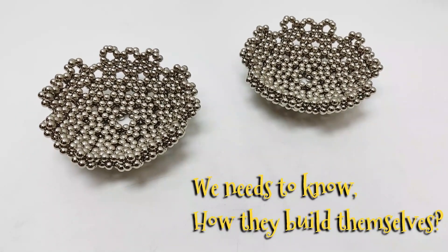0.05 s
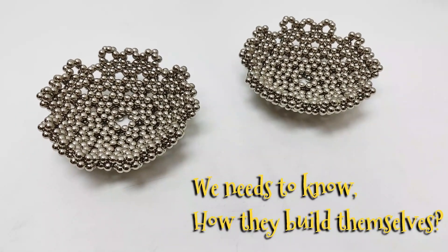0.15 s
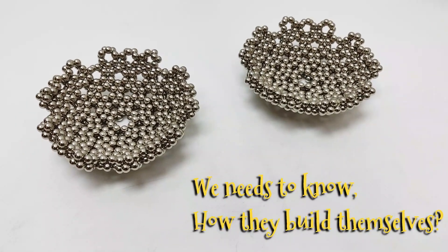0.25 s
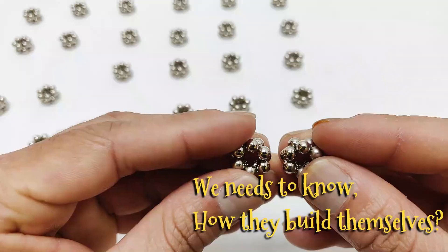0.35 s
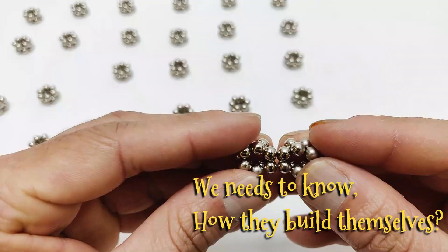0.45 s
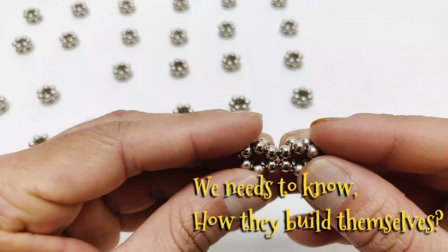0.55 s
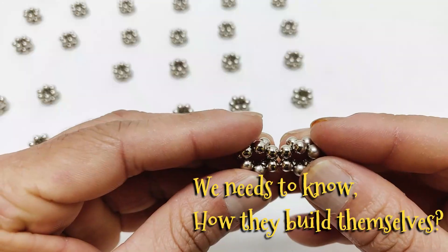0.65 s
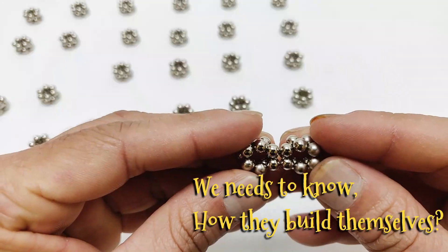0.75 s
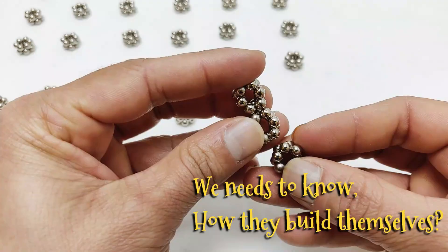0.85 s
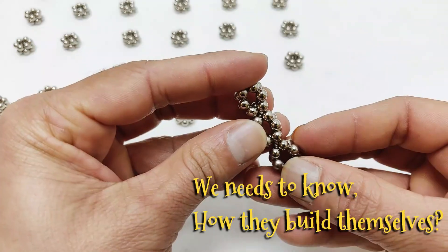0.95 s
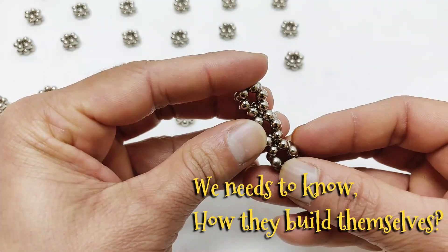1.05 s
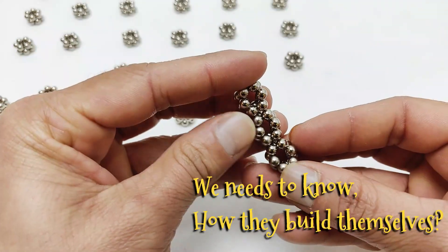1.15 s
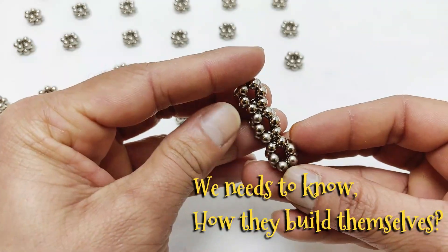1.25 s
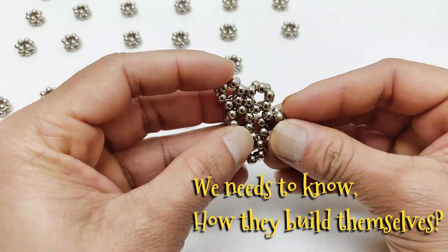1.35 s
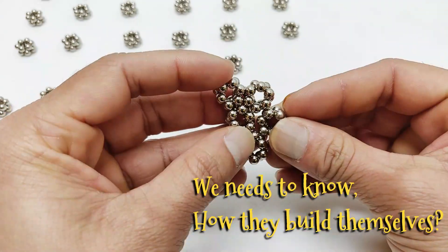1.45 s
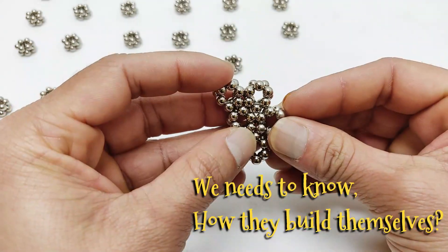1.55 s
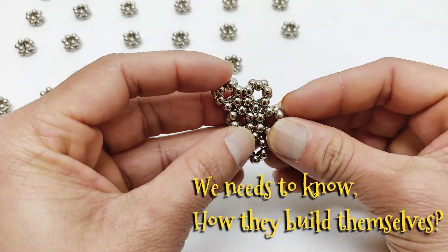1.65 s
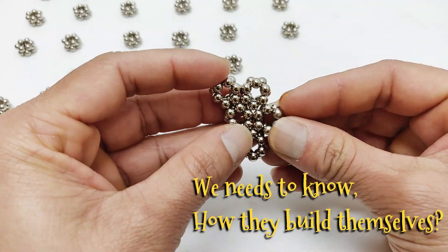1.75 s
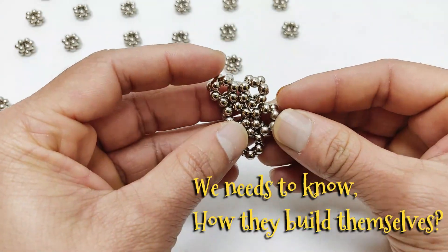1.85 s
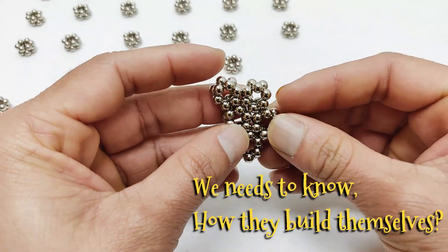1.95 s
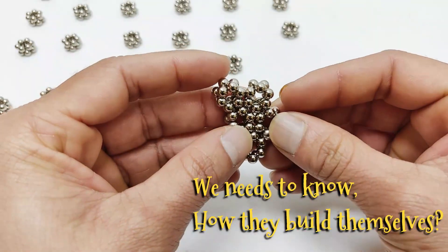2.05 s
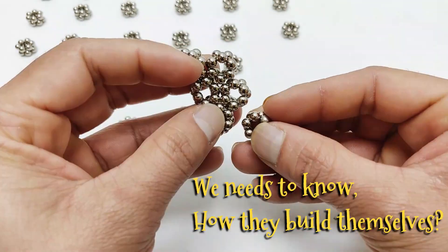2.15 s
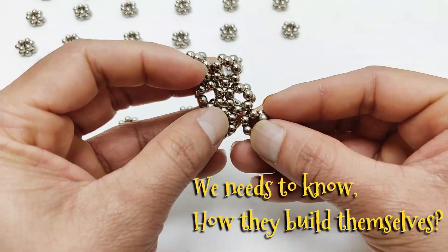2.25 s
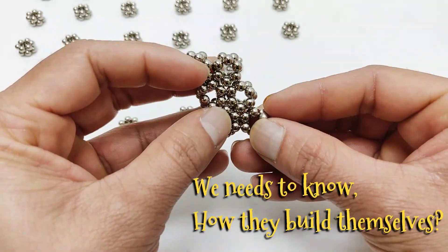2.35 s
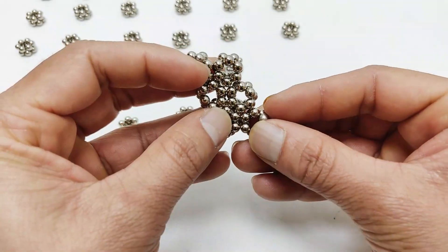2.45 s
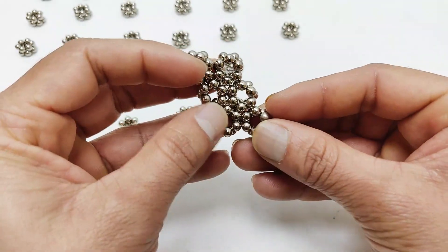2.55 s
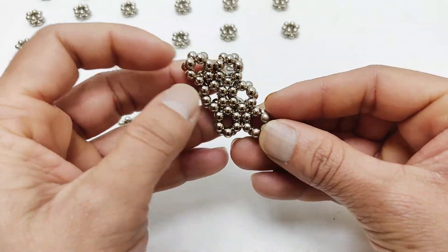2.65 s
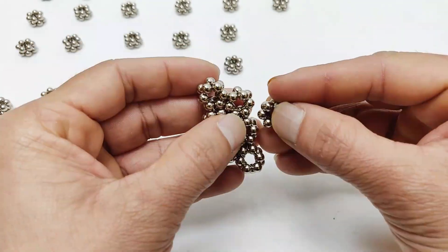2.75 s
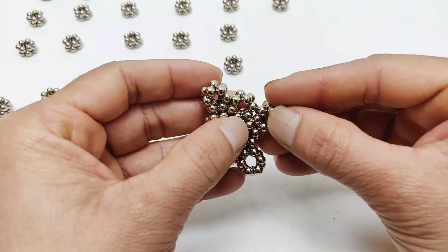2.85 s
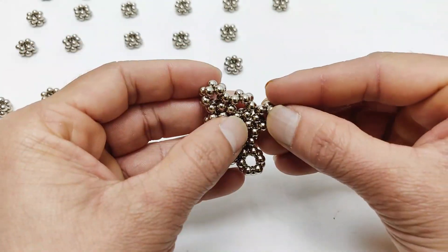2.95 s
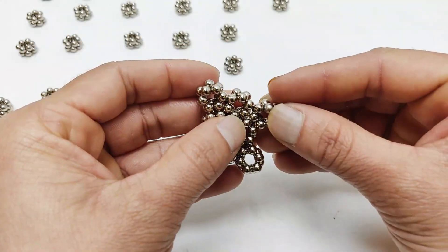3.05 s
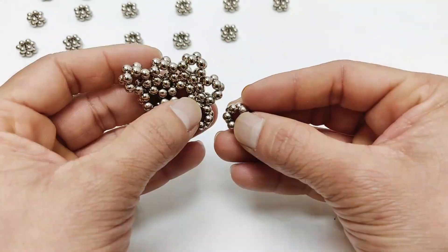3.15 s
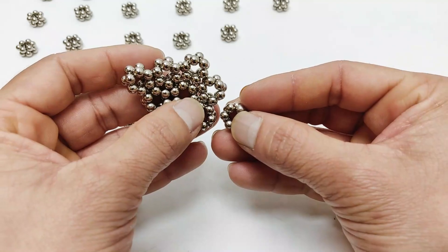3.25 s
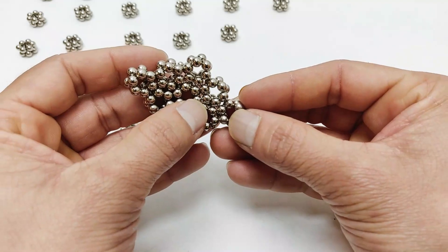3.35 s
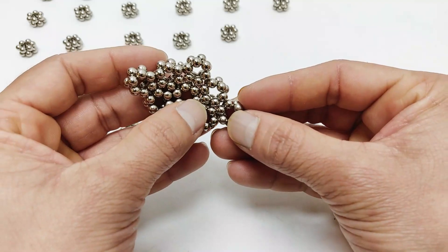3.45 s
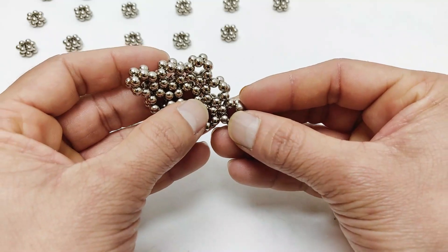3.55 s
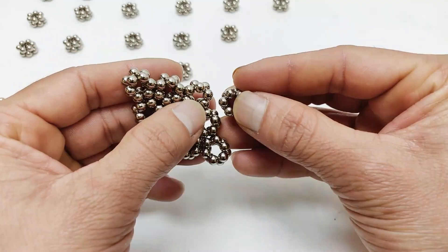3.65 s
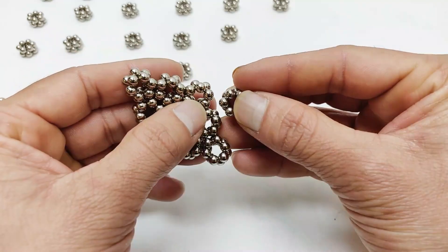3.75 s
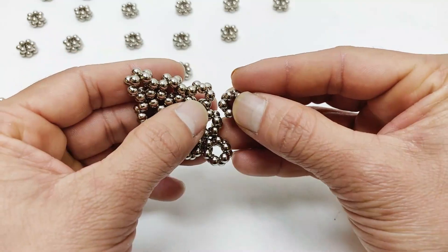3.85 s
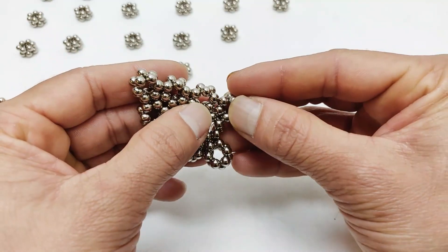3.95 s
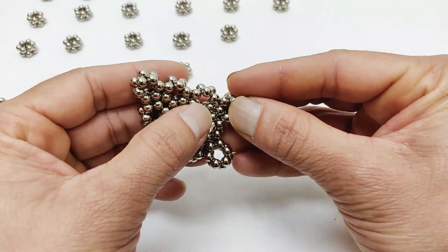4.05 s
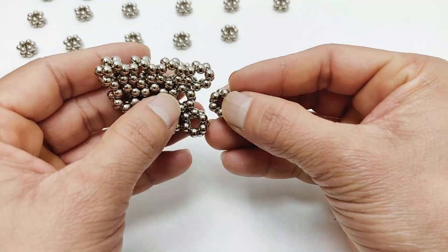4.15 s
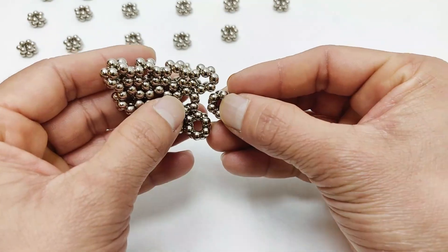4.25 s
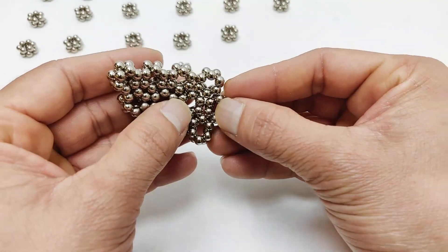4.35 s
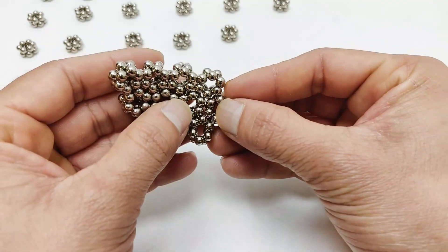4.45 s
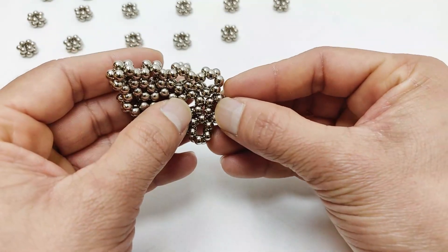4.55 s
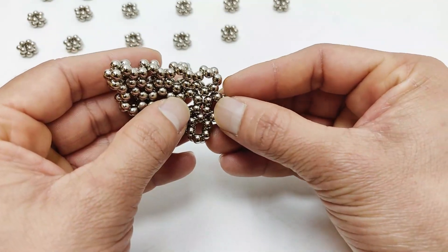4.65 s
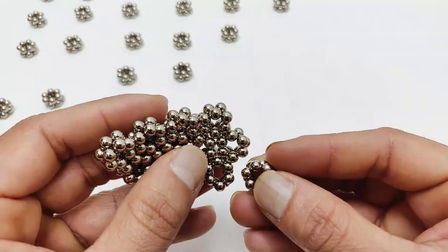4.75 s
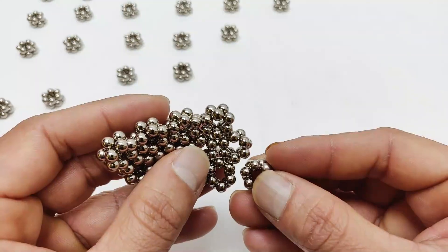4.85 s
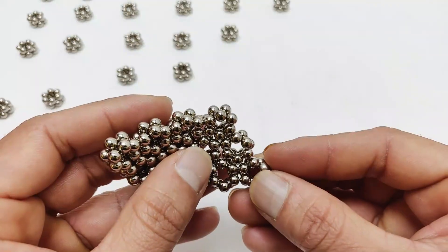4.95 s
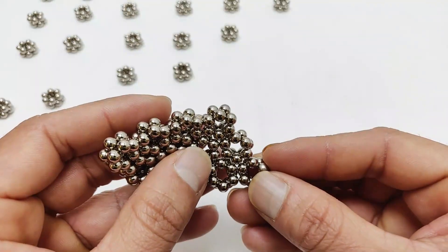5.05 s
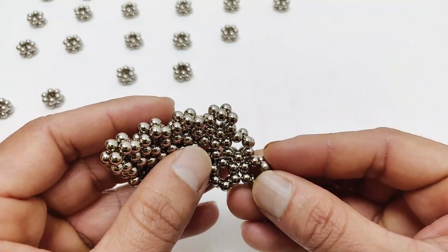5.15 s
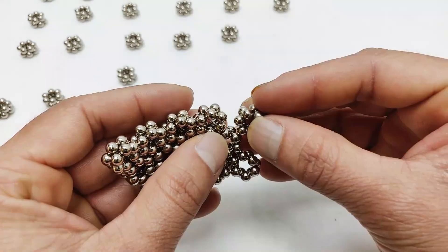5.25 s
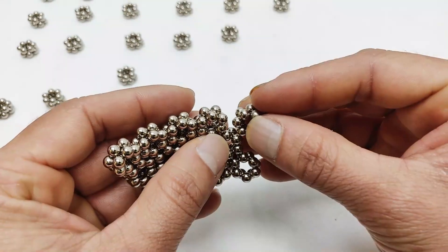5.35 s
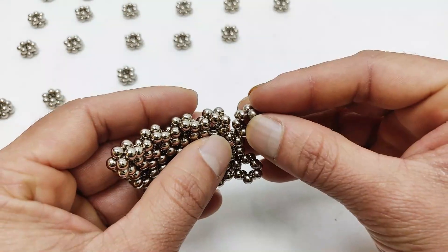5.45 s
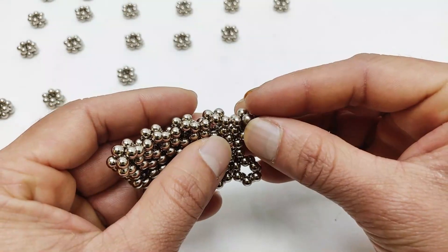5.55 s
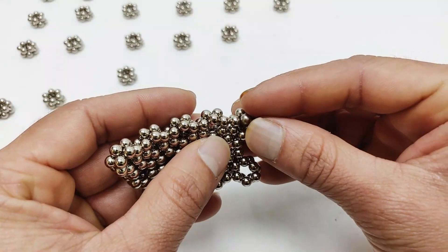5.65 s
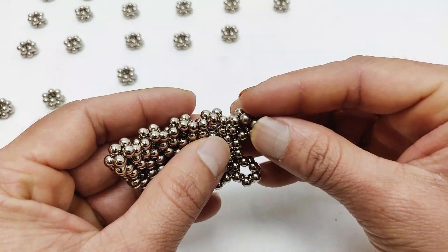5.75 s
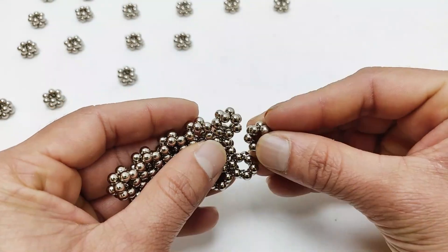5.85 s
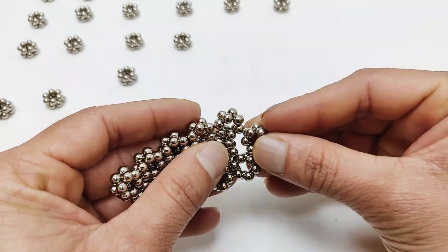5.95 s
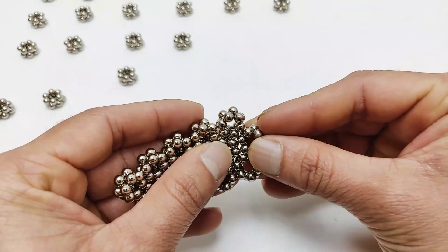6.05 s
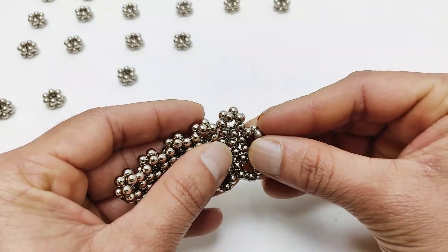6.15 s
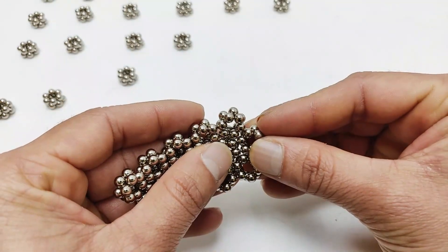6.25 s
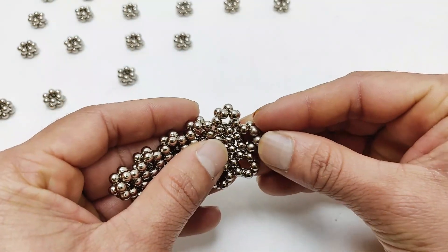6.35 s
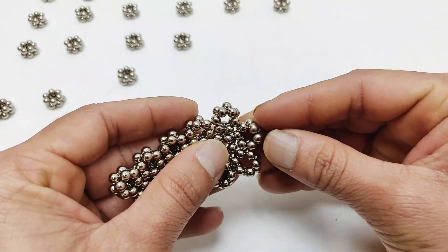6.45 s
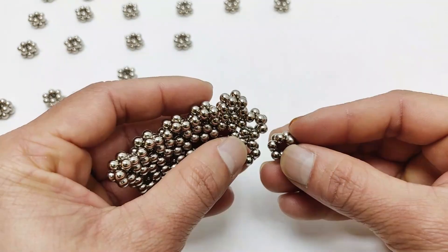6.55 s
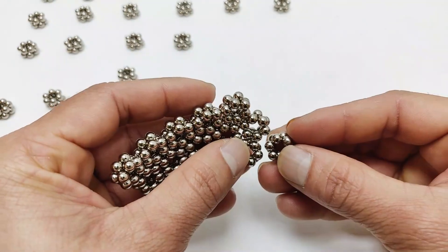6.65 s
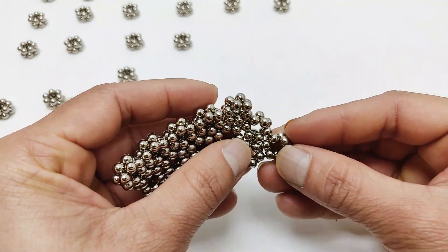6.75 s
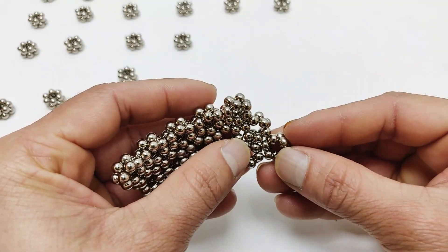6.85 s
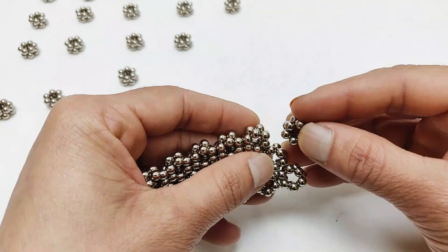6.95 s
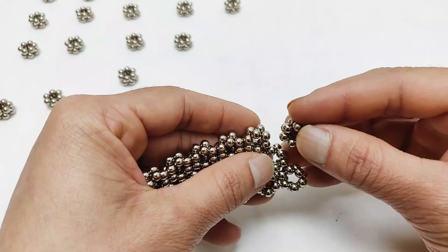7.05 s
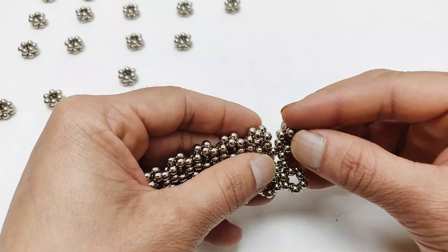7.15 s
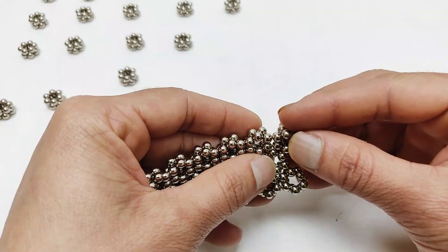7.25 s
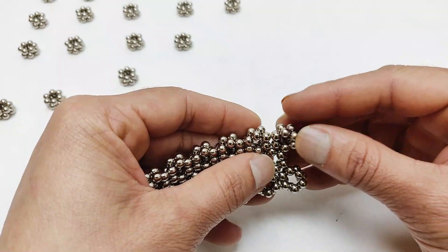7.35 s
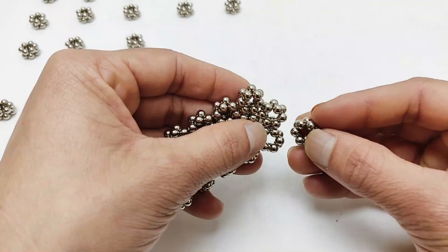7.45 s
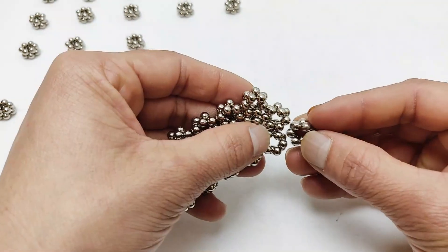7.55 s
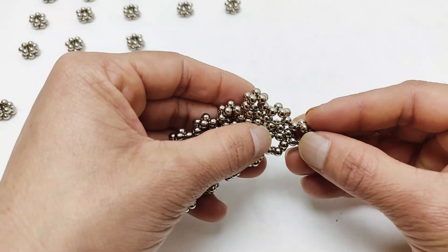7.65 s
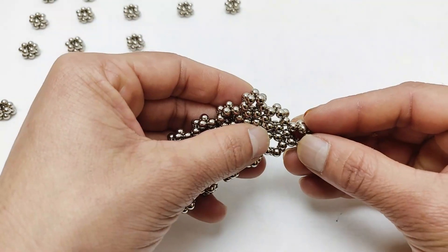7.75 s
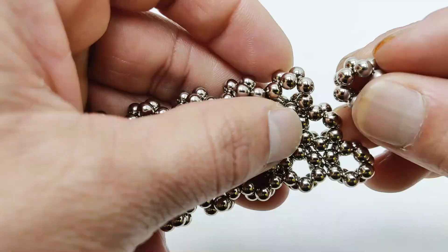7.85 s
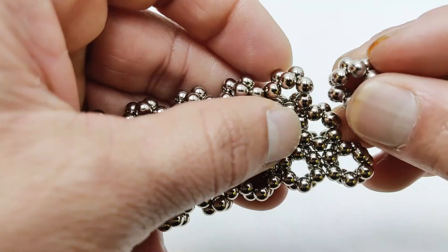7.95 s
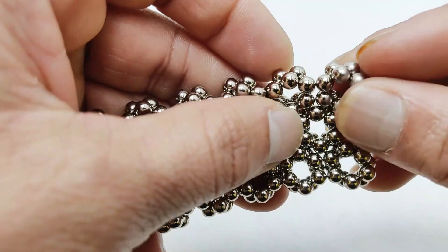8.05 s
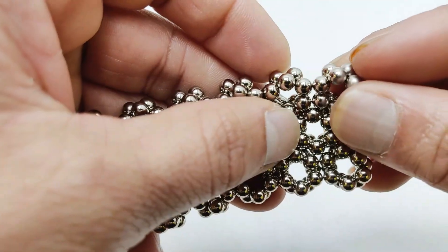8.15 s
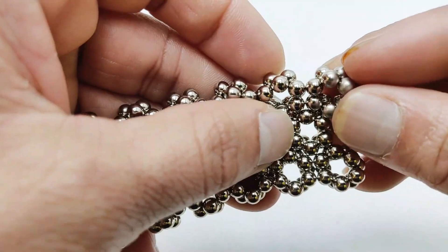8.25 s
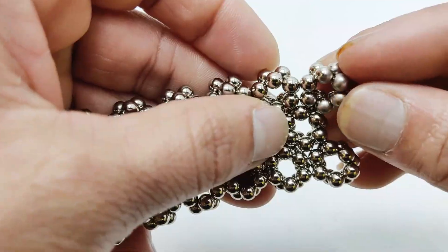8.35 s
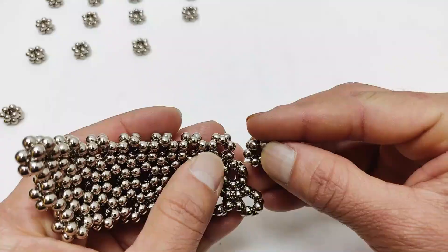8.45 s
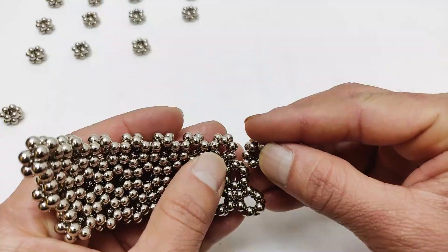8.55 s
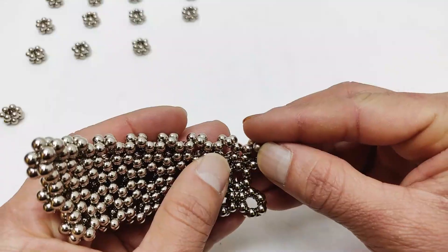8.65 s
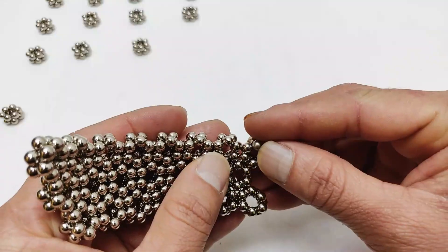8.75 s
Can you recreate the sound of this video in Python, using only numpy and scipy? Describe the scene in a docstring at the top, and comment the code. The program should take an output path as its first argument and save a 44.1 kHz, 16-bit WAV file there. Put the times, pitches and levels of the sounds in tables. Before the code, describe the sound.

Very close in a small dry room, rings of tiny steel magnet balls are snapped onto a growing piece held in the fingers. Hard, bright, very short clicks come irregularly, roughly two or three each second, some as tight double ticks. A faint low mains hum, thin air noise and soft low rumble of moving hands lie underneath. The stereo microphone hears the clicks slightly left.

```python
"""A small dry room, close up: rings of magnet balls are snapped onto a growing piece held in the fingers.
Each snap is one steel-on-steel contact or a quick run of three: a blow plus decaying noise, in four bands.
Hard snaps add a damped sine thud; the table top scatters the snaps and the room returns a diffuse wash.
Mains appliances hum behind as wavering tones; the air and the moving hands are coloured noise."""
import sys
import numpy as np
from scipy import signal
from scipy.fft import rfft, irfft
from scipy.io import wavfile
from scipy.ndimage import uniform_filter1d

SR = 44100
rng = np.random.default_rng(int(sys.argv[2]) if len(sys.argv) > 2 else 0)


def generate_wav(signal):
    """Clip the signal to [-1, 1] and save it as 16-bit WAV at the path in sys.argv[1]."""
    frames = np.transpose(np.atleast_2d(signal))
    scaled = np.clip(frames, -1, 1) * 32767
    pcm = np.round(scaled).astype(np.int16)
    wavfile.write(sys.argv[1], SR, pcm)


N = 388080

# snaps: (time [s], run from first touch to closing [s], closing blow over first touch [dB],
# pitch of the struck cluster [Hz], clack energy before trim [dB], then relative to it, before trim:
# tick [dB], low ring [dB], knock [dB]; left over right [dB]); a run of 0 is a single contact
SNAPS = [(0.5818, 0.0022, 2, 6740, -7, 7.5, -15.5, -19.5, 4),
         (1.0633, 0.00082, 6, 6500, -16.5, 7, -12, -14.5, 5.5),
         (1.1423, 0, 1.5, 6600, -18.5, 3.5, -10.5, -11, 3),
         (1.6033, 0.0036, 0.5, 6880, -13.5, 6, -12.5, -14, -1),
         (1.9352, 0, 0, 6570, -20.5, 3.5, -12, -17.5, 2.5), (2.1823, 0, 0, 6470, -53, 2.5, -4, 10.5, 2),
         (2.367, .0012, -1, 6680, -9.5, -3, -27, -19.5, 5.5),
         (2.383, .0034, -3, 6440, -12, -3, -17.5, -22, 3.5), (2.4154, 0, 0, 6550, -24, 3, -15, -15, 5),
         (2.9312, .0017, -2, 6380, -3.5, 0.5, -19.5, -21, 5.5),
         (3.4447, 0.00315, -11, 6391, -12, 4, -14.5, -18, 2.5),
         (3.4586, 0.0033, 3.5, 7090, -16, -2.5, -12, -18, 0),
         (4.0088, 0.0085, -8, 7595, -19.5, 1, -15.5, -15.5, 1.5),
         (4.027, 0.00079, -2.5, 6090, -9.5, 1.5, -13, -20, 1),
         (4.428, 0.0046, 6, 6393, -5, -1, -13, -18, 2),
         (5.007, 0.0012, 0.5, 6530, -8, -1.5, -15.5, -19, 1.5),
         (5.0248, 0.0027, -4, 6440, -13.5, 0, -16.5, -15.5, 1),
         (5.3627, 0, 0, 7740, -19.5, -1.5, -11.5, -14, 1),
         (5.5958, 0.00066, -6, 6663, -23.5, -5, -15, -22, 2.5),
         (5.6656, 0, 0, 5900, -3, -0.5, -11, -18.5, 4), (6.103, .0027, 2.5, 6630, -17, 2.5, -13.7, -16, 3),
         (6.1267, 0.00514, -5, 7300, -11, -2, -8.5, -19, 1.5),
         (6.809, 0.0015, 3.5, 4930, -7, 4.5, -4.5, -14, 0), (7.032, 0, 0, 6500, -52, 0, -6, 7, 0),
         (7.2594, 0.00043, 0, 6893, -18, -.5, -5, -18, 9.5),
         (7.2699, 0.0017, 0, 6930, -23, -2, -10.5, -20, -1.5),
         (7.2915, 0.00038, 7.5, 6897, -6, -2, -6.5, -21, 5),
         (7.6706, 0.0031, -1, 6050, -4, 2, -11.5, -22.5, 6.5),
         (8.1626, 0.0041, 4, 6870, -3, -3, -10, -24, 10.5), (8.689, 0, 0, 6520, -22, -.5, -8, -14, 1),
         (8.7369, 0.003, -3, 6460, -17, 0.5, -11.5, -24, 15),
         (8.7458, 0.00029, -1, 6605, -13, 0, -9, -18, -1.5)]


def amp(db):
    """Decibels to gain."""
    return 10 ** (np.asarray(db) / 20)


def unit(x):
    """Scales to rms 1 over all channels."""
    return x / np.sqrt(np.mean(x ** 2) + 1e-20)


def read(points, hz):
    """Interpolates a (frequency, value) table on a log-frequency axis."""
    f, value = np.transpose(points)
    return np.interp(np.log(hz + 1), np.log(f + 1), value)


def add(mix, start_s, sound):
    """Adds a sound to the mix in place, cut at the end."""
    part = mix[:, max(round(start_s * SR), 0):][:, :sound.shape[1]]
    part += sound[:, :part.shape[1]]


def drift(rate_hz, size=2048):
    """Slow random motion of rms 1: noise rolled off above rate_hz, without its mean."""
    hz = np.fft.rfftfreq(size, N / SR / size)
    roll_off = (hz > 0) / (1 + (hz / rate_hz) ** 2)
    slow = unit(irfft(rfft(rng.standard_normal(size)) * roll_off, size))
    return np.interp(np.arange(N), np.linspace(0, N, size), slow)


def low_pass(x, edge_hz):
    """Steep linear-phase band limit."""
    taps = signal.firwin(255, edge_hz, window=("kaiser", 9), fs=SR)
    return signal.oaconvolve(x, taps[None], "same")


def humps(rows):
    """Gain curve with one Gaussian hump per row (time [s], length [s], level [dB])."""
    t = np.arange(N) / SR
    return sum(amp(db) * np.exp(-(2 * (t - s) / length_s) ** 2) for s, length_s, db in rows)


def stereo_noise(spectrum):
    """Coloured noise of rms 1, alike at both ports in the bass and nearly unrelated in the treble."""
    # likeness of the ports: (frequency [Hz], left-right correlation [-1..1])
    likeness = [(30, 0.99), (120, 0.698), (250, 0.42), (500, 0.1), (1000, 0.012), (4000, 0.011),
                (16000, 0.027)]
    hz = np.fft.rfftfreq(N, 1 / SR)
    left, other = rfft(rng.standard_normal((2, N)))
    same = np.clip(read(likeness, hz), -1, 1)
    right = same * left + np.sqrt(1 - same ** 2) * other
    return unit(irfft(np.array([left, right]) * amp(read(spectrum, hz)), N))


def hum(waver_hz=1.75, spread_rad_per_200hz=0.228):
    """Mains and motor tones wavering in strength and phase; port phases part in proportion to frequency."""
    # tones: (frequency [Hz], level [dB rms], depth of wavering [ratio])
    hum_tones = [(100, -70.5, 0.17), (119.83, -60.5, .17), (149.2, -76, 0.28), (182.5, -74.5, 0.48),
                 (199.54, -75, 0.42), (303.5, -79, 0.56), (489, -90.5, 0.27), (542.7, -81.5, 0.18),
                 (599.4, -82.5, .3)]
    t, out = np.arange(N) / SR, np.zeros((2, N))
    for hz, db, depth in hum_tones:
        steady = np.exp(2j * np.pi * (hz * t + rng.random()))
        waver = drift(waver_hz) + 1j * drift(waver_hz)
        skew = np.exp(1j * spread_rad_per_200hz * hz / 200 * np.array([[1], [-1]]))
        out += amp(db) * unit((steady * (1 + depth * waver) * skew).real)
    return out


def background(air_db=-61.5, waver_db=0.36, waver_hz=1.85, edge_hz=15850):
    """Room air as wavering coloured noise, with soft mid-range swells."""
    # air: (frequency [Hz], relative density [dB per Hz])
    air_colour = [(20, -10), (50, -10), (75, -2), (92, 0.5), (140, -5), (200, -4), (260, -5), (400, -9.5),
                  (620, -12), (1000, -16.5), (2000, -23), (4000, -27), (9000, -28.5), (15500, -29)]
    # swells: (time [s], length [s], level [dB])
    swell_rows = [(2.62, .4, -70.5), (3.268, 0.26, -69), (6.45, 0.49, -75)]
    # swell spectrum: (frequency [Hz], relative density [dB per Hz])
    swell_colour = [(200, -29.5), (550, -12.5), (680, 10), (780, 3), (900, -7), (2000, -25), (8000, -60)]
    air = stereo_noise(air_colour) * amp(air_db + waver_db * drift(waver_hz))
    swells = stereo_noise(swell_colour) * humps(swell_rows)
    return low_pass(air + swells, edge_hz)


def hands(rest_db=1, tremor_db=1.2, tremor_hz=4, jerk_db=6.5, jerk_per_snap_db=0.23, jerk_peak_s=0.0202):
    """Rumble of the hands: a restless base that leaps after snaps, more for hard ones, plus grip shifts."""
    # restlessness: (time [s], level before rest_db [dB])
    restlessness = [(0.0, -64), (0.39, -67.5), (0.54, -63), (6.45, -70.5), (6.91, -68), (7.25, -74.5),
                    (7.62, -73), (8.33, -71.5), (8.8, -68)]
    # rumble spectrum: (frequency [Hz], relative density [dB per Hz])
    rumble_colour = [(10, -2.5), (22, 2), (55, 0), (75, -11), (110, -6), (300, -33.5), (1000, -81.5)]
    # shifts of grip: (time [s], length [s], level [dB])
    grip_shifts = [(0.4, 0.124, -54), (1.0, .1, -58), (1.27, .22, -54.5), (4.48, 0.1558, -58.5),
                   (6.58, .07, -66), (7.94, 0.099, -61), (8.47, 0.088, -57.5), (8.69, .12, -60)]
    t, jerk_power = np.arange(N) / SR, np.zeros((1, N))
    age = t[:SR // 2] / jerk_peak_s
    for s, _, _, _, clack_db, *_ in SNAPS:
        jerk = amp(jerk_db + jerk_per_snap_db * clack_db) * age * np.exp(1 - age)
        add(jerk_power, s, jerk[None] ** 2)
    base = amp(rest_db + np.interp(t, *np.transpose(restlessness)) + tremor_db * drift(tremor_hz))
    power = base ** 2 * (1 + jerk_power) + humps(grip_shifts) ** 2
    return stereo_noise(rumble_colour) * np.sqrt(power)


def causal(colour, size):
    """Minimum-phase response with this colour: it rings only after the blow."""
    log_gain = np.log(amp(read(colour, abs(np.fft.fftfreq(size, 1 / SR)))))
    return np.exp(np.conj(signal.hilbert(log_gain)))[:size // 2 + 1]


def run_of_contacts(run_s, build_db, between_db=1.5):
    """A ring touches with one ball, swings in and closes: rows (delay [s], share of the energy [dB])."""
    middle = rng.uniform(.3, .7)
    if run_s <= 0:
        return [(0.000068, 0)]
    # a neighbouring ball catches in between, at between_db over the weaker of the two
    db = np.array([-build_db / 2, between_db - abs(build_db) / 2, build_db / 2])
    share_db = db - 10 * np.log10(np.sum(amp(db) ** 2))
    return zip(run_s * np.array([0, middle, 1]), share_db)


def contact(levels_db, pan_db, ports, bands, chatter_db=2.0, chatter_t60_s=0.011, own_share=0.36, size=1024):
    """One blow, then dense chatter as the shock runs through the neighbouring balls and off the fingers."""
    t = np.arange(size) / SR
    shared, *own = rng.standard_normal((3, size))
    share = np.clip(own_share, 0, 1)
    chatter = np.sqrt(1 - share) * shared + np.sqrt(share) * np.array(own)
    chatter *= amp(-60 * t / chatter_t60_s)
    chatter /= np.linalg.norm(chatter, axis=1, keepdims=True)
    blow = signal.unit_impulse(size) + amp(chatter_db) * chatter
    ring = irfft(rfft(blow) * ports, size)
    ring = ring / np.linalg.norm(ring, axis=1, keepdims=True) * amp([[pan_db / 2], [-pan_db / 2]])
    # how squarely the balls meet, and how many are shaken, sets the share of each band
    out = np.zeros((2, size))
    for sections, db in zip(bands, levels_db):
        band = signal.sosfilt(sections, ring)
        out += amp(db) * band * np.sqrt(2) / np.linalg.norm(band)
    return out


def magnets(clack_trim_db=-1.5, tick_trim_db=-0.95, right_lag_s=.0001, lag_spread_s=.00003,
            cluster_db=2.5, cluster_width_hz=300, size=1024):
    """Snaps as contacts ringing the struck cluster; where the balls meet varies the right port's lag."""
    # bands clack, tick, low ring, knock: (from [Hz], to [Hz])
    band_edges = [(5400, 9500), (9500, 17000), (3500, 5400), (900, 3500)]
    # colour of a contact at the left port: (frequency [Hz], relative gain [dB])
    left_colour = [(700, -18), (1300, -19), (2200, -18.5), (3500, -15.5), (4300, -4.5), (5400, -4),
                   (6000, 4.5), (7000, 8.5), (7800, -2), (9200, -9), (12000, 3.5), (13000, 5),
                   (15500, 12.5), (16800, -7.5)]
    # colour of a contact at the right port: (frequency [Hz], relative gain [dB])
    right_colour = [(700, -18), (1300, -25), (3500, -19.5), (4700, 2), (6500, -12), (7600, 8), (8900, -2.5),
                    (9700, -4.5), (10800, -1), (13000, 2), (14800, 6), (15700, 1), (16800, -0.5)]
    hz, out = np.fft.rfftfreq(size, 1 / SR), np.zeros((2, N))
    left, right = causal(left_colour, size), causal(right_colour, size)
    bands = [signal.butter(4, edges, "bandpass", fs=SR, output="sos") for edges in band_edges]
    for s, run_s, build_db, cluster_hz, clack_db, tick_db, low_ring_db, knock_db, pan_db in SNAPS:
        levels_db = clack_db + np.array([clack_trim_db, tick_db + tick_trim_db, low_ring_db, knock_db])
        cluster = 1 + amp(cluster_db) / (1 + 2j * (hz - cluster_hz) / cluster_width_hz)
        for delay_s, share_db in run_of_contacts(run_s, build_db):
            lag_s = abs(right_lag_s + lag_spread_s * rng.standard_normal())
            ports = cluster * np.array([left, right * np.exp(-2j * np.pi * hz * lag_s)])
            add(out, s + delay_s, contact(levels_db + share_db, pan_db, ports, bands))
    return out


def thuds(t60_s=0.0251, pan_db=1, size=2048):
    """Hard snaps jolt the piece: its mass bounces on the flesh of the fingers for a few damped cycles."""
    # thuds: (time [s], pitch [Hz], level at onset before decay and pan [dB])
    thud_rows = [(0.583, 500, -47), (2.9315, 730, -46), (4.4295, 558, -49), (4.432, 788, -46.5),
                 (5.008, 583, -48.5), (5.666, 374, -48.5), (6.8095, 755, -50), (7.672, 352.4, -46),
                 (8.167, 425, -45.5)]
    t, out = np.arange(size) / SR, np.zeros((2, N))
    pan = amp([[pan_db / 2], [-pan_db / 2]])
    for s, hz, db in thud_rows:
        add(out, s, amp(db - 60 * t / t60_s) * np.sin(2 * np.pi * hz * t) * pan)
    return out


def table_top(x, level_db=-16, t60_s=0.0121, first_s=0.0022, density=0.22):
    """Quick scatter off the table and the hands: sparse random taps that die away."""
    t = np.arange(SR // 20) / SR
    taps = rng.standard_normal((2, len(t))) * (rng.random((2, len(t))) < density)
    taps *= (t > first_s) * amp(-60 * t / t60_s)
    taps /= np.linalg.norm(taps, axis=1, keepdims=True)
    return amp(level_db) * signal.fftconvolve(x, taps, axes=1)[:, :N]


def room(x, right_db=0.5, delay_s=.003, size=256):
    """Sound returns from all sides as a diffuse wash: the energy in each band dies at its own speed."""
    # tail: (frequency [Hz], t60 [s], level relative to the direct sound [dB])
    tail = np.array([(300, 0.12, -13), (2000, 0.15, -8), (4300, 0.183, -13.5), (6440, 0.17, -16),
                     (9500, 0.156, -14), (14900, 0.158, -17)])
    hz, t, direct = signal.stft(x, SR, nperseg=size)
    t60_s = read(tail[:, [0, 1]], hz)[:, None]
    level_db = read(tail[:, [0, 2]], hz)[:, None]
    power = uniform_filter1d((abs(direct) ** 2).mean(0), size=3, axis=0)
    age_s = t[t < .5]
    decay = amp(-60 * age_s / t60_s) ** 2 * (age_s > delay_s)
    decay = decay / decay.sum(1, keepdims=True)
    stored = signal.fftconvolve(power, decay, axes=1)[:, :len(t)]
    wash = signal.stft(rng.standard_normal((2, N)), SR, nperseg=size)[2]
    wash *= np.sqrt(abs(stored)) / wash.std() * amp(level_db)
    return signal.istft(wash, SR, nperseg=size)[1][:, :N] * amp([[-right_db / 2], [right_db / 2]])


def scene():
    """Snaps and their echoes over the hum, the air and the hands."""
    snaps = magnets() + thuds()
    echoes = table_top(snaps) + room(snaps)
    return snaps + echoes + hum() + background() + hands()


def record(dry):
    """The recorder's band limit."""
    return low_pass(dry, edge_hz=16300)


dry = scene()
out = record(dry)
generate_wav(out)
```